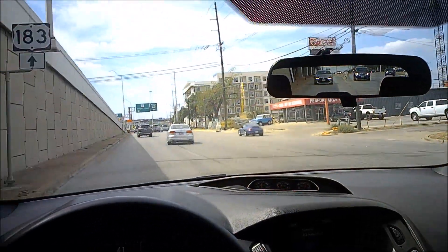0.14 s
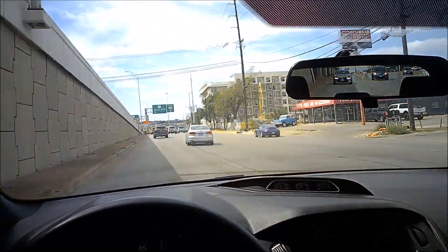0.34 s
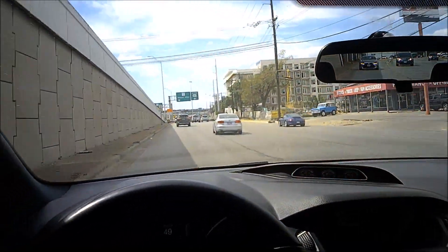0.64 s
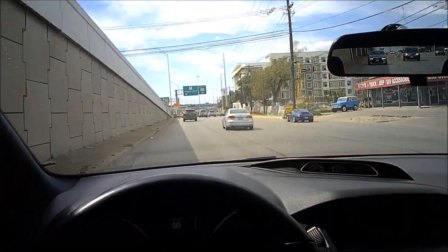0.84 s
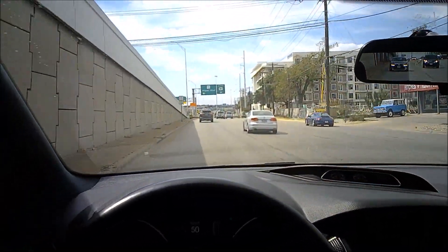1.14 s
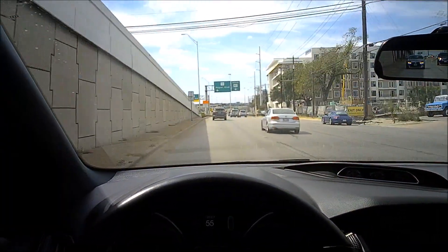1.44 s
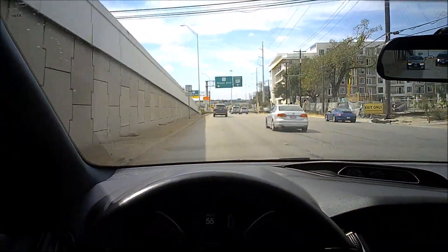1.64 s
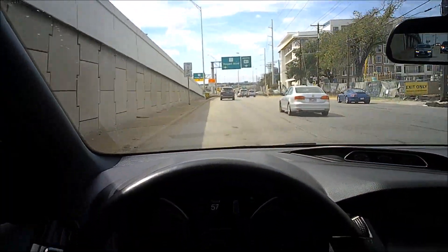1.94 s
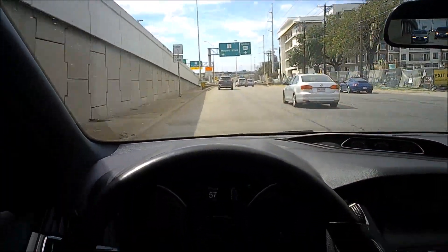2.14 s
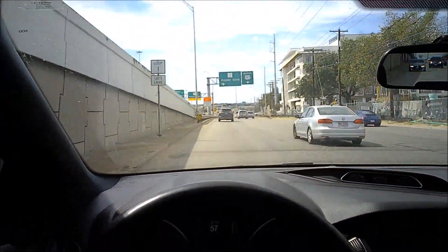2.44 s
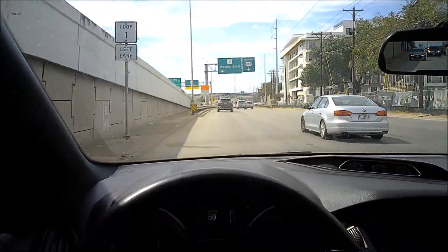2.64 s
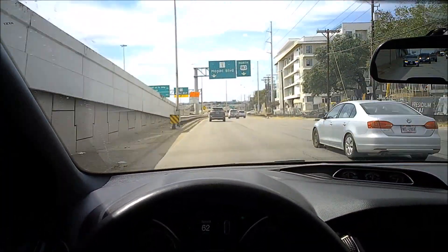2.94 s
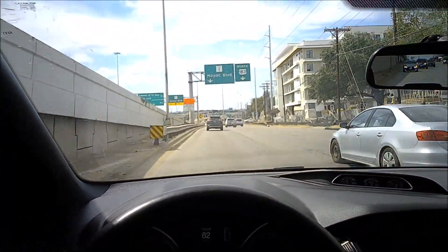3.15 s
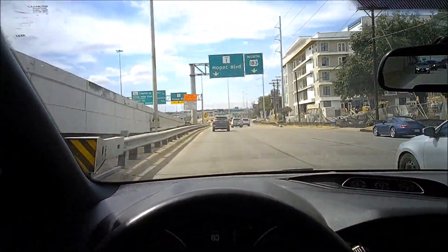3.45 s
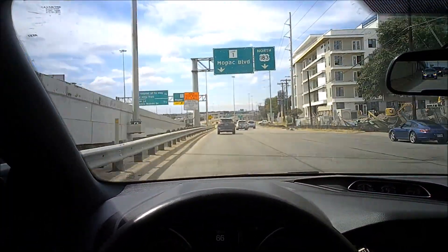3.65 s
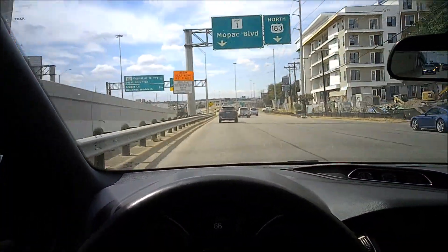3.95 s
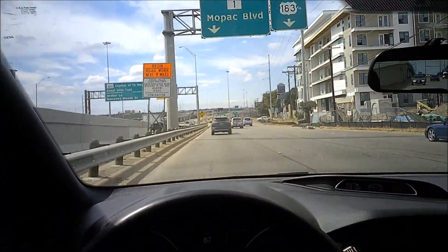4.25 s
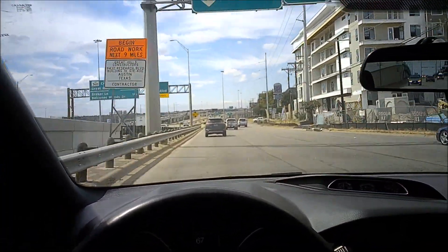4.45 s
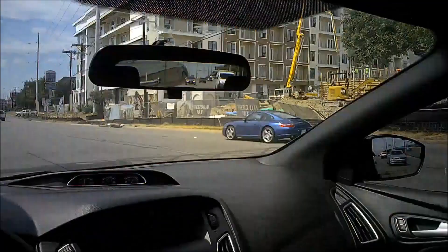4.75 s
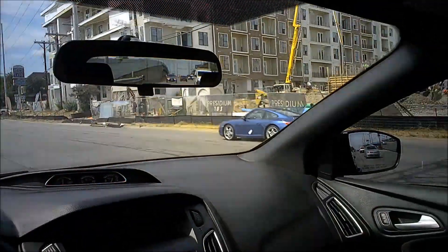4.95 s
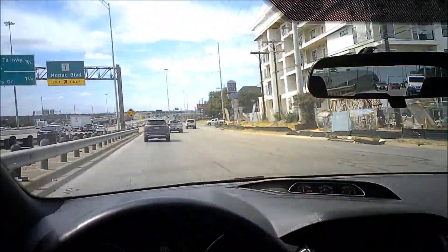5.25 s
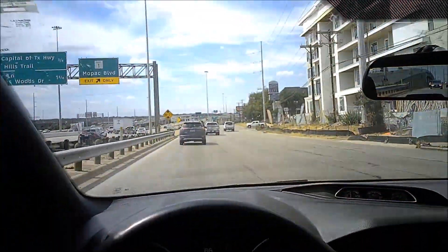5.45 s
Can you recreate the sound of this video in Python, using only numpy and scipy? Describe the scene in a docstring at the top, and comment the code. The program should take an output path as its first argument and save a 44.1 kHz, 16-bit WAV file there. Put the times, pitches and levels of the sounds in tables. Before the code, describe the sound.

Close mono cabin perspective, dry and enclosed, with little top end. A buzzy, slightly rough engine note sweeps upward for nearly two seconds, over tyre rumble and air rush. A quick upshift follows: sudden drop in load, double metallic clack, breathy valve hiss, deep floor thuds. A second, lower and slower pull lasts until about four seconds, then the engine goes quiet into a low humming coast with road noise and a loud plastic tick.

```python
"""Turbocharged car: pull, upshift, pull, lift-off

Inside a four-cylinder car: a hard pull, an upshift, a second pull, then the driver lifts off.
The engine is a sum of sines on multiples of its cycle rate, with an air rush of noise puffing at each firing.
At the shift the lever clacks (ringing modes) and the boost vents (narrow-band noise); loose trim ticks and creaks.
Beneath lie shaped noise for tyre rumble and hiss, and a wavering low sine for the boom of the floor pan."""
import sys
import numpy as np
from scipy import signal
from scipy.fft import rfft, irfft
from scipy.io import wavfile
from scipy.ndimage import uniform_filter1d

SR = 44100
rng = np.random.default_rng(int(sys.argv[2]) if len(sys.argv) > 2 else 0)


def wrap_up_sound(samples):
    """Save the sound to the file named by the first command line argument, as 16-bit audio."""
    columns = np.atleast_2d(samples).T
    # keep every value between -1 and 1, then stretch to whole-number steps
    tamed = np.clip(columns, -1, 1)
    steps = np.round(tamed * 32767).astype(np.int16)
    wavfile.write(sys.argv[1], SR, steps)


N = 247401  # samples

# engine speed and pull: start_s, cycle_rate_hz, load_db (relative to full load)
ENGINE_COURSE = [(0, 39.66, 0.5), (.3, 42.26, 0.5), (.55, 44.97, -0.5), (.9, 46.77, 1), (1.2, 48.87, -1),
                 (1.5, 50.82, 0), (1.88, 52.91, 0.5), (1.92, 53.5, -4), (1.98, 53.17, -10.5),
                 (2.05, 51.73, -12.5), (2.24, 49.3, -22), (2.28, 47.58, -11), (2.3, 46.6, -6.5),
                 (2.35, 44.12, -4.5), (2.4, 41.52, -1.5), (2.46, 37.35, -4), (2.51, 35.9, -4),
                 (2.64, 37, -2), (3, 38.2, 0), (3.6, 40.78, 2), (3.92, 41.97, 0), (3.96, 42.1, -4.5),
                 (4.02, 41.3, -19), (5.61, 40.61, -19)]


def amp(db):
    """Level to amplitude: twenty decibels are a factor of ten."""
    return 10 ** (np.asarray(db) / 20)


def evened(x):
    """Normalisation to unit rms, the root of the mean power."""
    return x / np.sqrt(np.mean(x ** 2) + 1e-20)


def read(points, hz):
    """Spectral interpolation: straight lines of level over logarithmic frequency."""
    f, value = np.transpose(points)
    return np.interp(np.log(hz + 1), np.log(f + 1), value)


def curves(rows):
    """Piecewise-linear envelopes: each column after the time, one value a sample."""
    s, *columns = np.transpose(rows)
    return [np.interp(np.arange(N) / SR, s, c) for c in columns]


def drift(hz):
    """Low-pass random process: white noise under a Gaussian response that is 1/e at hz, rms 1."""
    z = rfft(rng.standard_normal(N))
    response = np.exp(-(np.fft.rfftfreq(N, 1 / SR) / hz) ** 2)
    return evened(irfft(z * response, N))


def noise(spectrum, size, patchy_db):
    """Coloured noise: random short-time spectra, their level drifting in patches of time and frequency."""
    frames, hz = 4 * N // size + 5, np.fft.rfftfreq(size, 1 / SR)
    real, imaginary, patches = rng.standard_normal((frames, len(hz), 3)).T
    patches = uniform_filter1d(patches, size=8, axis=0)  # across frequency
    patches = evened(uniform_filter1d(patches, size=6, axis=1))  # across time
    level_db = read(spectrum, hz)[:, None] + patchy_db * patches
    z = (real + 1j * imaginary) * amp(level_db)
    return evened(signal.istft(z, nperseg=size, noverlap=3 * size // 4)[1][:N])


def engine():
    """Harmonic synthesis: a periodic cycle sounds on its multiples; each level follows speed, load or time."""
    # strongest multiples of the cycle rate (4 is the firing rate)
    leading = [4, 5, 7, 8, 9, 10, 11, 12]
    # their own paths into the cabin: cycle_rate_hz, then level_db at full load, one column a multiple
    leading_db = [(35.97, -23.5, -44, -18.5, -19, -19, -33.5, -21.5, -44.5),
                  (37.66, -22.5, -32.5, -12.5, -29, -25.5, -27.5, -32, -40.5),
                  (38.1, -25.5, -29, -14.5, -26.5, -28.5, -28.5, -42, -40.5),
                  (39.3, -24.5, -28, -15.5, -25.5, -29, -26.5, -35, -40.5),
                  (40.2, -27.5, -28.5, -16, -32, -28, -31.5, -45.5, -34),
                  (41.63, -29, -25, -13, -37, -26.5, -34.5, -38, -31.5),
                  (43.15, -28.5, -30.5, -13.5, -31.5, -28.5, -43.5, -32.5, -38),
                  (45.5, -29, -24.5, -13.5, -26, -29.5, -44, -40.5, -38.5),
                  (46.78, -44.5, -31, -17, -24.5, -52.5, -30.5, -45, -39.5),
                  (48.32, -22, -27, -19.5, -19.5, -33, -28.5, -35.5, -37.5),
                  (48.86, -24.5, -30, -22, -22, -37, -37, -39.5, -38.5),
                  (50.56, -21.5, -24.5, -23.5, -21, -33, -48, -31.5, -37.5),
                  (52.67, -21.5, -26.5, -23.5, -32, -26.5, -49.5, -41.5, -41),
                  (53.34, -20, -27.5, -18.5, -30.5, -33, -44, -40, -48)]
    # per leading multiple: change_db for each dB of load
    leading_per_load = [1.4, 1.3, 1.97, 0.89, 1.2, 0.66, 0.96, 1]
    # per leading multiple: change_db while the clutch drags the speed down at slip_hz_per_s or faster
    slipping_db = [1, -4.5, 0.5, -11.5, -3.5, -3.5, -0.5, -2.5]
    slip_hz_per_s = 50
    # per leading multiple: lowest level_db, what stays without load
    coasting_db = [-32.5, -47.5, -57, -38.5, -48, -45.5, -49, -45.5]
    # multiples of the rasp above the main note
    upper = [13, 15, 16, 17, 18, 19, 20]
    # rasp: cycle_rate_hz, then level_db at full load, one column a multiple
    upper_db = [(37.21, -43.5, -35.5, -36, -59, -60.5, -56, -55.5),
                (37.9, -48, -43.5, -53, -55, -47.5, -49.5, -56),
                (39, -45.5, -45, -43.5, -61, -47.5, -49, -40.5),
                (39.9, -35.5, -37.5, -41.5, -53, -48.5, -51, -41.5),
                (40.36, -38.5, -51.5, -40, -44.5, -54.5, -37, -49.5),
                (40.36, -38, -50, -47, -48, -46.5, -46, -43), (41.7, -44, -59.5, -55.5, -52, -46, -49, -56),
                (43.7, -40.5, -43.5, -48, -55.5, -45.5, -58, -46.5),
                (45.2, -40, -45, -45.5, -43, -49, -57.5, -56),
                (46.2, -55.5, -41, -45, -42.5, -57.5, -55, -52),
                (48.1, -45.5, -46, -43.5, -42, -55.5, -59, -55),
                (49.2, -43.5, -53.5, -44, -55, -56.5, -58, -56.5),
                (50.2, -43, -44, -46.5, -54.5, -48, -54, -50),
                (52.3, -48, -41, -43.5, -54, -50, -48.5, -54)]
    # other multiples of the cycle rate
    pulling = [6, 14, 21, 22, 23, 24, 26, 28, 30]
    # per other multiple: level_db at full load, before the cabin response
    pulling_db = [-16.5, -22, -25, -22.5, -30, -26, -19, -23, -25.5]
    # response from engine bay to ear: frequency_hz, gain_db
    cabin = [(150, -18), (180, -20.5), (210, -24), (250, -15), (290, -22.5), (340, -16), (365, -18.5),
             (390, -10), (420, -26), (520, -25), (600, -28), (680, -29), (780, -26), (880, -33),
             (1000, -32.5), (1300, -35), (2200, -24.5)]
    # multiples that come forward as the load falls away
    turning = [6, 16]
    # per such multiple: level_db at full load
    turning_db = [-53.5, -56]
    # third multiple, which booms at cruise: start_s, level_db
    drone_db = [(0, -43), (3.9, -42), (4.05, -27), (4.5, -34.5), (5.2, -30), (5.61, -28)]
    # gear whine on multiple 40: cycle_rate_hz, level_db at full load
    whine_table = [(37.3, -53), (38.4, -54), (39.5, -59), (40.5, -63), (44, -63.5), (46, -59.5),
                   (47.2, -60.5), (49.2, -52.5), (50.5, -67), (52, -54.5), (53, -57)]

    hz, load_db = curves(ENGINE_COURSE)
    angle = 2 * np.pi * np.cumsum(hz * (1 + .0012 * drift(hz=12))) / SR
    # uneven burning makes the levels waver
    quick = [drift(hz=6.0) for _ in leading]
    slow = [drift(hz=2.5) for _ in range(7)]
    slip = np.clip(-np.gradient(hz) * SR / slip_hz_per_s, 0, 1)
    slip = uniform_filter1d(slip, size=1500)

    lines = []  # (multiple, level in dB at every sample)
    speed, *full_db = np.transpose(leading_db)
    for k, db, per_load, slip_db, rest_db, waver in zip(
            leading, full_db, leading_per_load, slipping_db, coasting_db, quick):
        driven_db = np.interp(hz, speed, db) + per_load * load_db + slip_db * slip
        lines.append((k, np.maximum(driven_db, rest_db) + 0.69 * waver))
    speed, *full_db = np.transpose(upper_db)
    for k, db in zip(upper, full_db):
        lines.append((k, np.interp(hz, speed, db) + 1.1 * load_db + 0.8 * quick[k % 8]))
    # several paths into the cabin add and cancel, so these multiples fade in and out
    for k, db in zip(pulling, pulling_db):
        fading_db = 3.9 * quick[k % 5] + 0.1 * k * slow[k % 7]
        lines.append((k, db + 0.63 * load_db + read(cabin, k * hz) + fading_db))
    for k, db in zip(turning, turning_db):
        lines.append((k, db - 0.34 * load_db + 1.4 * quick[k % 5]))
    lines.append((3, curves(drone_db)[0] + 2.6 * quick[3]))
    start = rng.uniform(0, 2 * np.pi, len(lines))
    tones = np.sqrt(2) * sum(amp(db) * np.sin(k * angle + p) for (k, db), p in zip(lines, start))

    # complex noise on the carrier spreads the whine into a breathy, loose tone
    whine_width_hz, whine_fuzz = 32, 0.74
    fuzz = whine_fuzz * (drift(whine_width_hz) + 1j * drift(whine_width_hz))
    whine_db = np.interp(hz, *np.transpose(whine_table)) + 1.5 * load_db + 2.7 * quick[0]
    whine = amp(whine_db) * ((1 + fuzz) * np.exp(40j * angle)).real
    return tones + whine, angle


def intake(angle):
    """Amplitude modulation: the rush of air and combustion puffs with each firing and each cycle."""
    # rush spectrum, shape only: frequency_hz, relative_level_db (per Hz)
    rush_spectrum = [(150, -38), (300, 5.5), (500, -1), (800, -13), (1400, -19.5), (1800, -23), (2200, -26),
                     (3000, -37.5), (4000, -42.5), (5000, -83)]
    hz, load_db = curves(ENGINE_COURSE)
    t = np.arange(N) / SR
    # level at full load and 45 cycles a second, then its slopes with load and speed
    level_db = -30.5 + .22 * load_db + 0.235 * (hz - 45)
    # the rush builds with the boost from the start
    wakes_s, start_db = 0.65, -12
    level_db += start_db * np.clip(1 - t / wakes_s, 0, 1)
    puffs = 1 + 0.064 * np.cos(angle) + 0.5 * np.cos(4 * angle)
    return amp(level_db) * evened(puffs * noise(rush_spectrum, size=1024, patchy_db=1.1))


def vent():
    """Narrow-band noise: a slow random process on a carrier makes the fuzzy whistle of the boost valve."""
    # boost vented at the shift: start_s, level_db
    vent_db = [(1.98, -86.5), (2.06, -44), (2.14, -59), (2.24, -43), (2.3, -38), (2.36, -47.5),
               (2.45, -87.5)]
    pitch_hz, width_hz = 1396, 85
    carrier = np.sqrt(2) * np.sin(2 * np.pi * pitch_hz * np.arange(N) / SR)
    return amp(curves(vent_db)[0]) * drift(hz=width_hz) * carrier


def lever():
    """Modal ringing: two knocks ring the shift linkage, each mode roughened by the scrape of the gate."""
    # the gear lever goes home: start_s, level_db
    clacks = [(2.008, -35), (2.021, -28.5)]
    # modes of the linkage: frequency_hz, relative_level_db, t60_s
    linkage_modes = [(1000, -1, .03), (1500, -8, .02), (2080, 0, 0.048), (2350, -11, .02), (2800, -19, .02),
                     (3400, -14, .025), (3800, -17, .025), (4250, -17, .02), (4900, -27, .015),
                     (5650, -16, .025), (6200, -27, .015), (6800, -26, .015)]
    out, t = np.zeros(N), np.arange(4096) / SR
    for s, db in clacks:
        scrape = rng.standard_normal((len(linkage_modes), len(t)))
        scrape = uniform_filter1d(scrape, size=60, axis=1)
        ring = np.zeros(len(t))
        for (hz, mode_db, t60), rough in zip(linkage_modes, scrape):
            decay = amp(mode_db - 60 * t / t60)
            ring += decay * (1 + 2.5 * rough) * np.sin(2 * np.pi * hz * t)
        at = round(s * SR)
        out[at:at + len(t)] += amp(db) * ring * np.clip(t / .0025, 0, 1)
    return out


def trim():
    """Modal ringing: each tick chatters briefly, holding up the modes of loose plastic, which then decay."""
    # start_s, level_db, low_lift_db (below 3.35 kHz), high_lift_db (above 4.8 kHz), pitch_factor,
    # chatter_s, ring_factor (scales t60)
    ticks = [(.1635, -45, -5, 16, 1.05, .006, 1.3), (0.1798, -43, 2.5, 1.5, 1.01, 0.0062, 1.4),
             (0.254, -50.5, 4, 19, 1.02, .007, 1.1), (.3615, -55, -8, 2, 1.06, .006, 2.5),
             (0.5873, -45.5, 2.5, 18.5, 0.98, .008, 1.2), (.61, -55, -2.5, 1.5, 0.95, .012, 2.5),
             (.944, -47, 3, 11, .97, .004, 1.3), (.976, -50.5, -5.5, -3, 1.01, .004, 1.2),
             (1.044, -47, 16, 16, 1, .004, 1.1), (1.053, -46, 8.5, 0, 0.98, .004, 1.1),
             (1.061, -50, 8, -1, .97, .003, .9), (1.071, -48, 5, -2, 0.89, .004, 1.2),
             (1.161, -51, -9, 2, 0.99, .004, 1.1), (3.56, -49, 0, 0.5, 1.01, .005, 1.2),
             (4.4855, -23.5, -2, -20, 0.97, 0.0048, 0.95), (4.731, -52, 10, 25, 1.01, .003, .8),
             (5.16, -53, -10, 4, 1.06, 0.0049, 0.93), (5.294, -61, 14, -2, 0.92, 0.0051, 1.11),
             (5.373, -58, 16, 10, 0.89, 0.0031, .8)]
    # modes of the plastic before the tick's factors: frequency_hz, relative_level_db, t60_s
    plastic_modes = [(1380, -14, .06), (1690, -17.5, .06), (1950, -18, 0.072), (2290, -11.5, .09),
                     (2430, -19.5, 0.066), (2800, -16.5, .045), (3000, -20.5, .06), (3260, -15, 0.067),
                     (3480, -11.5, .04), (3560, -6.5, 0.031), (3850, -6.5, 0.058), (3950, -4.5, .055),
                     (4080, -9.5, 0.063), (4230, -15, .045), (4520, -17, .04), (5000, -33, .018),
                     (5350, -34, .018), (5760, -30.5, .018), (6250, -33, .018), (6750, -35.5, .018),
                     (7200, -38, .018)]
    low_hz, high_hz = 3350, 4800
    out, t = np.zeros(N), np.arange(6000) / SR
    hz, mode_db, t60 = np.transpose(plastic_modes)[:, :, None]
    chance = rng.random((len(ticks), 2, len(hz), 1))
    for (s, db, low_db, high_db, pitch, chatter_s, ring), (start, detune) in zip(ticks, chance):
        level_db = db + mode_db + low_db * (hz < low_hz) + high_db * (hz > high_hz)
        level_db = level_db - 60 * np.maximum(t - chatter_s, 0) / (ring * t60)
        mode_hz = hz * pitch * (1 + 0.0082 * (detune - .5))
        # each mode starts at a random phase anywhere in the full cycle
        modes = amp(level_db) * np.sin(2 * np.pi * (mode_hz * t + start))
        at = round(s * SR)
        out[at:at + len(t)] += modes.sum(0) * np.clip(t / 0.0026, 0, 1)
    return out


def buzz():
    """Shot noise: random impulses with decaying tails gate plastic-coloured noise into faint creaks."""
    # loose plastic, shape only: frequency_hz, relative_level_db
    plastic_spectrum = [(700, -55), (1100, -24.5), (1800, -24.5), (2120, -7), (2400, -17.5), (2800, -17),
                        (3300, -13), (3750, 1.5), (4300, -11.5), (4800, -52.5)]
    level_db, creaks_per_s, t60_s = -69, 77, 0.09
    size = amp(2.9 * np.minimum(rng.exponential(1, N), 4))
    size *= rng.random(N) < creaks_per_s / SR
    tail = amp(-60 * np.arange(3000) / SR / t60_s)
    puffs = signal.oaconvolve(size, tail)[:N]
    return amp(level_db) * evened(puffs * noise(plastic_spectrum, size=512, patchy_db=2.0))


def tyre_rumble():
    """Filtered random excitation: road roughness reaches the cabin through the suspension."""
    # rumble, shape only: frequency_hz, relative_level_db (per Hz)
    rumble_spectrum = [(10, -31), (20, -11), (45, 9), (62, -6), (85, 5.5), (120, 5), (165, -1), (210, -2),
                       (250, -5), (290, -15), (400, -13), (600, -52), (1500, -89.5)]
    # start_s, level_db
    rumble_db = [(0, -27), (1.3, -26), (2.2, -23), (3.1, -23), (3.95, -23.5), (4.28, -20), (4.64, -26),
                 (4.75, -22.5), (5.06, -26), (5.2, -23), (5.4, -21), (5.61, -22)]
    return amp(curves(rumble_db)[0]) * noise(rumble_spectrum, size=4096, patchy_db=1.3)


def wind_hiss():
    """Broadband noise of wind and tread, shaped by resonances of dash and glass near 2 and 3.8 kHz."""
    # hiss, shape only: frequency_hz, relative_level_db (per Hz)
    hiss_spectrum = [(200, -21.5), (400, 0), (600, -10.5), (750, 2), (1500, -5.5), (1750, -18.5),
                     (2100, -13.5), (2800, -28.5), (3800, -22.5), (4250, -29.5), (4700, -32.5), (6800, -34),
                     (7200, -31), (7600, -38.5), (8000, -49), (8300, -65.5)]
    # start_s, level_db
    hiss_db = [(0, -41.5), (1, -37), (2, -38), (3, -38), (4, -36.5), (4.6, -40), (5.61, -39.5)]
    return amp(curves(hiss_db)[0]) * noise(hiss_spectrum, size=512, patchy_db=1.0)


def floor_boom():
    """Low resonance: the floor pan swings at a wandering pitch and swells at each bump."""
    # bumps: peak_time_s, level_db, half_length_s (to 1/e), pitch_hz (before its wander)
    bumps = [(0.154, -26, 0.024, 24.5), (1.108, -21, 0.04, 26.46), (1.229, -25.5, .04, 25.9),
             (1.368, -28, 0.047, 24.96), (1.678, -31, 0.033, 23.4), (1.995, -18, 0.032, 26),
             (2.118, -14, 0.048, 33), (2.21, -22, 0.038, 31.06), (2.3, -17.5, 0.048, 26.7),
             (2.615, -23.5, 0.064, 24.02), (3.054, -18, 0.043, 25.05), (3.201, -20.5, 0.054, 24.89),
             (3.394, -29, 0.035, 24.6), (3.507, -24.5, 0.035, 23.96), (3.683, -22.5, 0.074, 26.01),
             (4.039, -23, 0.15, 30.85), (4.554, -23.5, 0.071, 30.22), (4.896, -25.5, 0.055, 29.96),
             (5.499, -20, 0.12, 30.8)]
    t, (when, _, _, pitch_hz) = np.arange(N) / SR, np.transpose(bumps)
    wandering_hz = np.interp(t, when, pitch_hz) * (1 + .15 * drift(hz=7.0))
    swing = 2 * np.pi * np.cumsum(wandering_hz) / SR
    size = amp(-35 + 2.5 * drift(hz=3.4))  # wavering boom on even road
    for s, db, half_s, _ in bumps:
        size += amp(db) * np.exp(-((t - s) / half_s) ** 2)
    return np.sqrt(2) * size * np.sin(swing)


def scene():
    """Linear superposition: the pressures of all sources add at one listening point."""
    tones, angle = engine()
    car = tones + intake(angle) + vent() + lever() + trim() + buzz()
    return (car + tyre_rumble() + wind_hiss() + floor_boom())[None]


def record(dry):
    """Band limitation: a linear-phase low-pass removes what lies above the edge."""
    edge_hz = 8200
    low_pass = signal.firwin(601, edge_hz, window=("kaiser", 9), fs=SR)
    return signal.oaconvolve(dry, low_pass[None], "same")


dry = scene()
out = record(dry)
wrap_up_sound(out)
```